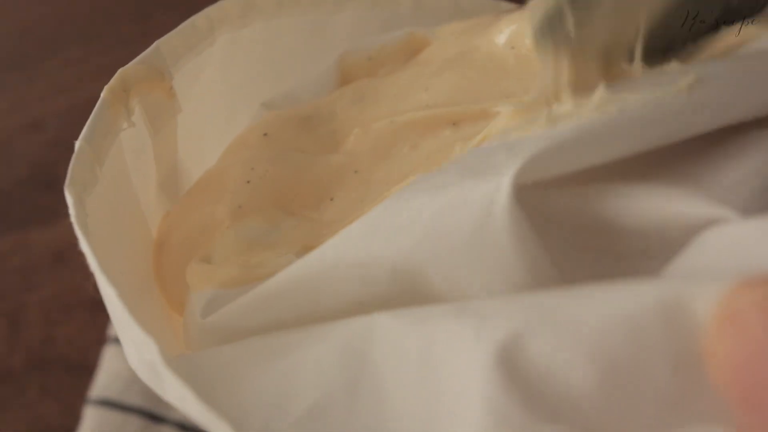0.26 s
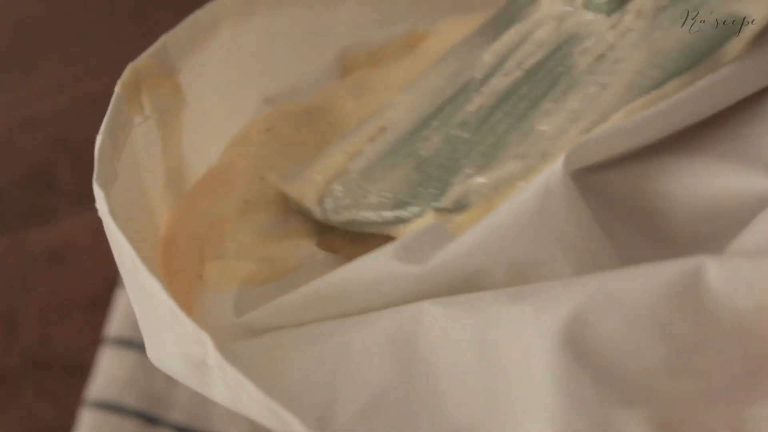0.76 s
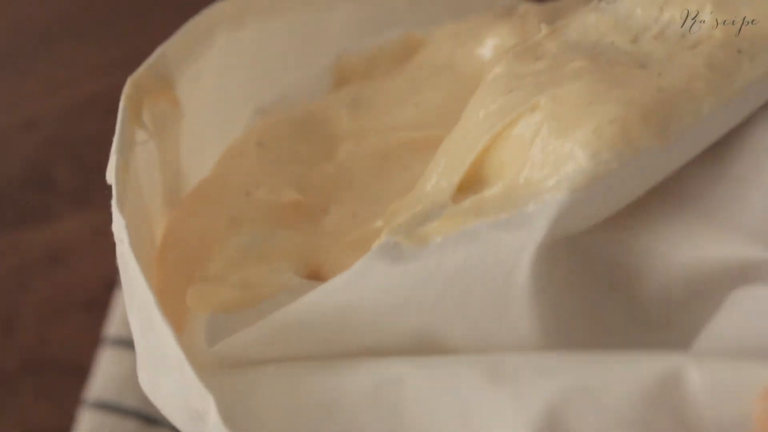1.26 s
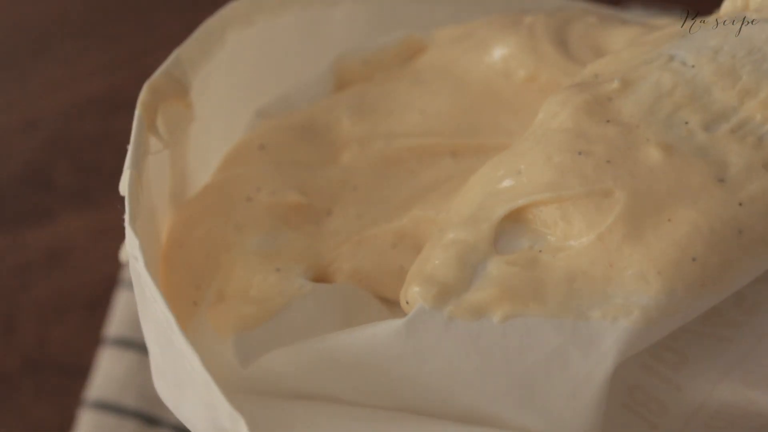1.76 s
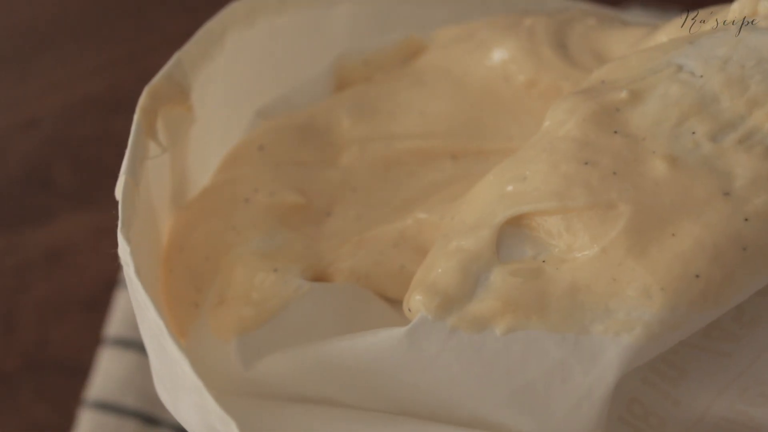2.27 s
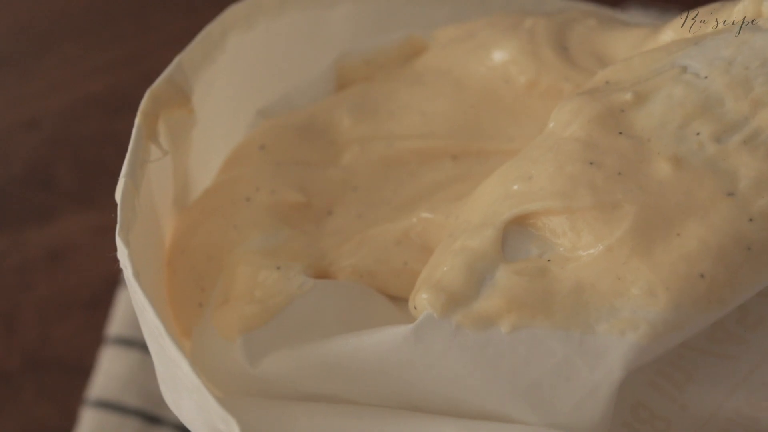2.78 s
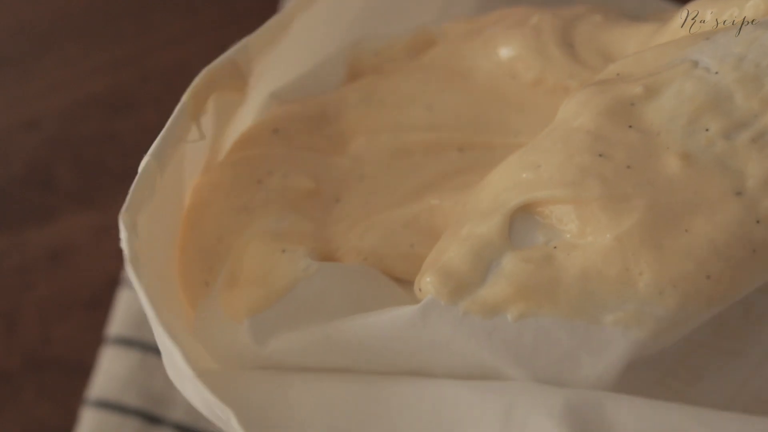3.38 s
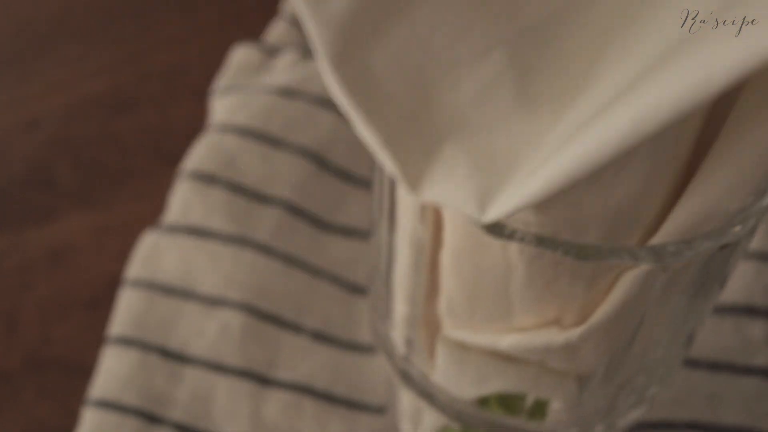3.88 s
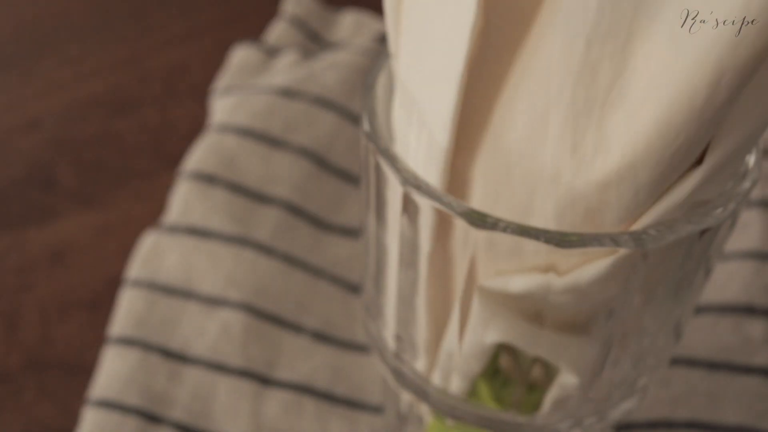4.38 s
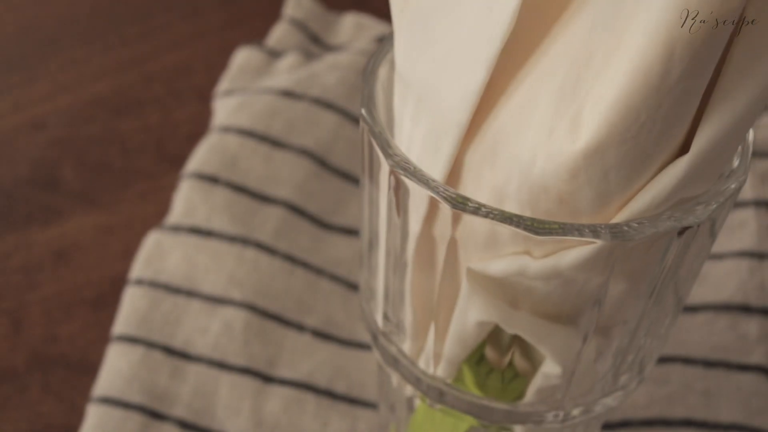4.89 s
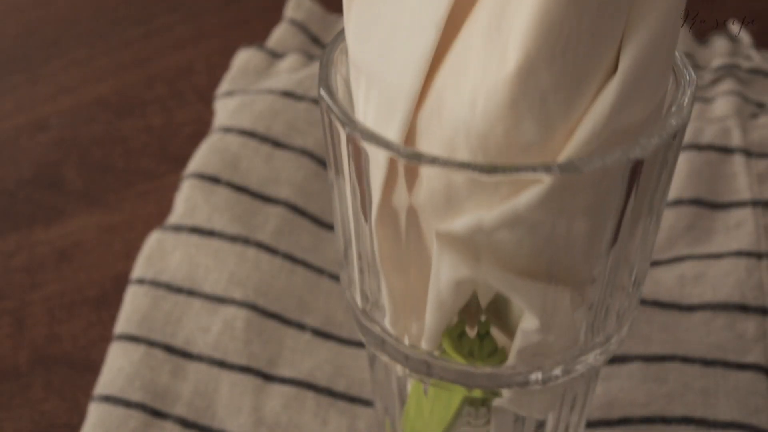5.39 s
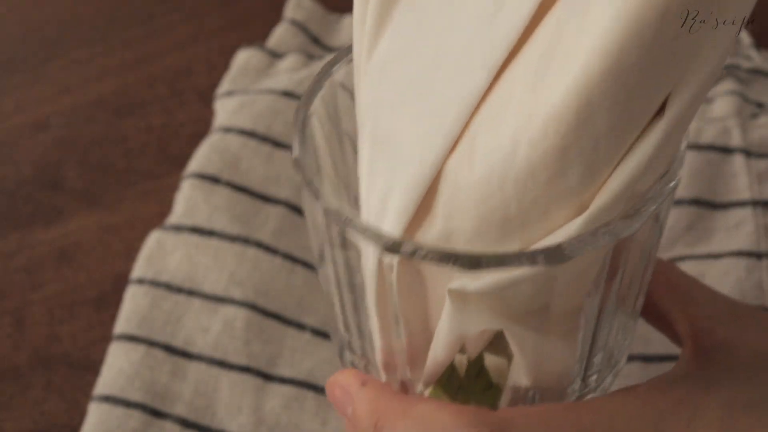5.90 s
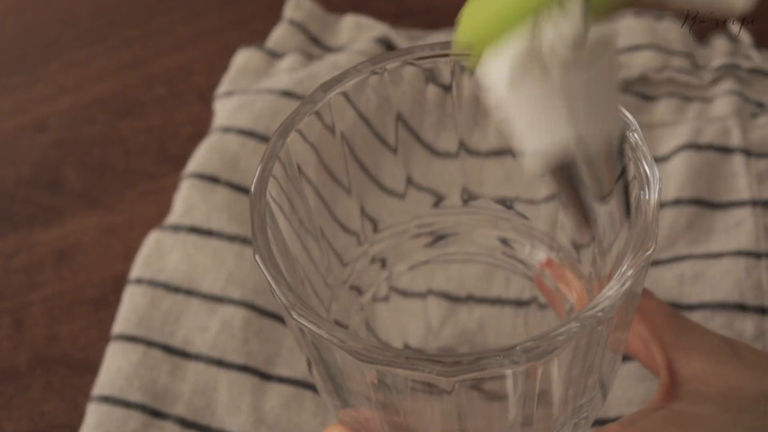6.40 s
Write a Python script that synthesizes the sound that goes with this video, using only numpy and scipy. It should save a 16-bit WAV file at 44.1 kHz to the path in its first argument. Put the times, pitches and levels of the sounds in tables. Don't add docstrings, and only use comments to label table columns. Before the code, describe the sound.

Soft film rustling and one bowl knock lead to sharp, loud crackling of a heavy batter bag, then a tiny squeak and faint glass ring.

```python
import sys
import numpy as np
from scipy import signal
from scipy.fft import rfft, irfft
from scipy.io import wavfile
from scipy.ndimage import uniform_filter1d

SR = 44100
rng = np.random.default_rng(int(sys.argv[2]) if len(sys.argv) > 2 else 0)


def transcribe(u):
    v = np.clip(np.atleast_2d(u).T, -1, 1)
    q = np.round(v * 32767).astype(np.int16)
    wavfile.write(sys.argv[1], SR, q)


def voltage_ratio(decibels):
    exponent = np.asarray(decibels, float) / 20
    return 10 ** exponent


N = 293265
LIFT_S, SCENE_CHANGE_S = 3.37, 1.028

BAND_HZ = (1350, 4200, 11000)
BAND_WIDTH_HZ = (1400, 4500, 7000)
# [f/Hz, level/dB]
FILM_COLOUR = [(450, -5.5), (700, -4.5), (1800, -8), (2600, -3), (3500, -1), (5000, -2), (7000, -2),
               (9000, -3), (12000, -13), (16000, -22)]
# [f/Hz, level/dB]
TAUT_COLOUR = [(1500, 7.5), (2100, 11), (3000, 6.5), (4200, 9.5), (6400, 14), (7100, 6.5), (14500, 13.5)]
# [f/Hz, level/dB]
SLACK_COLOUR = [(1000, 0.5), (1700, -1.5), (2200, 1), (3500, 0), (6500, 0.5), (9000, -1.5), (14000, 3)]
# [peak t/s, length/s, hiss
# level/dB, folds re hiss/dB, fizz re hiss/dB]
BRUSHES = [(.168, 0.18, -51.5, -27, -18), (.289, 0.14, -53, -8.5, -7), (.871, 0.14, -52, -33, -20.5),
           (.988, 0.043, -53, -25, -8), (1.08, 0.13, -52.5, -13, -1.5), (1.17, 0.066, -45.5, -3.5, -5.5),
           (1.24, 0.096, -43.5, -1.5, 1), (1.462, 0.28, -40.5, -6.5, -7.5), (2.886, 0.035, -46, 0, -26),
           (3.002, 0.1, -41.5, -0.5, 2), (3.154, 0.11, -63, -16, 6), (3.27, 0.13, -56, -2, -2),
           (3.517, 0.13, -39, 7, -4), (3.823, 0.028, -41, 11, -29), (3.98, 0.075, -37.5, 12, -10.5),
           (4.442, 0.069, -48.5, 18, 2), (4.472, 0.46, -44.5, 10, -23), (4.625, 0.098, -44, 1.5, -1),
           (4.745, 0.12, -43.5, 0.5, -9), (4.999, 0.024, -47, 5, -0.5), (5.192, 0.11, -34.5, 5.5, -26.5),
           (5.404, 0.14, -48.5, 10, -32), (5.8, 0.2, -73, 3, 6), (6.332, 0.16, -53.5, 2, -2),
           (6.492, 0.055, -52.5, -0.5, 4.5)]
# [full from t/s, length/s, hiss level/dB, folds re hiss/dB, fizz re hiss/dB]
DRAGS = [
    (.4, 0.28, -55.5, -13, -21),
    (.698, 0.11, -48.5, -14, -15.5),
    (2.946, 0.11, -45.5, -4, -33),
    (3.361, 0.16, -44, 2, 0),
    (3.569, 0.32, -33, 7, 0.5),
    (4.093, 0.44, -34.5, 9.5, -4.5),
    (5.172, 0.18, -40, -1, 7.5),
    (6.195, 0.12, -63.5, 8, 0.5),
]
# [peak t/s, length/s, hiss level/dB, folds re hiss/dB, fizz re hiss/dB]
FLICKS = [
    (1.722, 0.31, -47, -7, 4.5),
    (3.852, 0.19, -39, 9, -14),
    (4.862, 0.088, -50, 11.5, 7),
    (5.188, 0.063, -28, 10, -1),
    (5.968, 0.22, -62, 3, -19.5),
    (6.148, 0.071, -42, -20, 1.5),
    (6.164, 0.035, -56, 21.5, -10),
]
BRUSH_SHAPE = (0.56, 0, 0.51)
DRAG_SHAPE = (0.18, 0.48, 0.22)
FLICK_SHAPE = (0.12, 0, 0.71)
PUSH_SHAPE = (0.26, 0, 0.51)
# [folds/dB, hiss/dB, fizz/dB]
ENDS_DB = (-14.5, -16.5, -24.5)
# [folds/dB, hiss/dB, fizz/dB]
REST_DB = (-66, -79.5, -82)
# [t/s, level/dB, f/Hz]
TICKS = [(.2371, -30.5, 2500), (0.326, -38, 830), (0.6739, -30, 1570), (1.2491, -19.5, 1050),
         (1.2678, -29.5, 1080), (3.381, -28.5, 1060), (3.805, -19, 1660), (6.131, -29, 1940),
         (4.4732, -18.5, 1020), (4.514, -18.5, 1130), (4.754, -17, 2370), (4.8921, -18, 1690),
         (4.9929, -30, 905), (5.3215, -26.5, 1357), (6.559, -48, 4190)]
# [t/s, level/dB, f/Hz, bright edge/dB]
POPS_OUT = [
    (3.4959, -14, 1037, -22),
    (3.5048, -14, 1270, -15),
    (3.855, -2.5, 2760, -12),
    (3.931, -9, 1560, -17.5),
    (4.3774, -7.5, 2400, -28),
    (4.3811, -6, 790, -27),
    (4.6102, -12, 1290, -13),
    (5.358, -15, 1460, -14.5),
    (5.403, -3.5, 970, -22),
]
# [t/s, level/dB, f/Hz, bright edge/dB]
POPS_IN = [(3.4479, -5.5, 2170, -32), (3.562, -13, 800, -19), (3.7374, -5.5, 2380, -17.5),
           (3.847, -9.5, 890, -12.5), (3.877, -9.5, 1036, -25), (4.0888, -7, 1620, -11),
           (4.4764, 0.5, 886, -21.5), (4.563, -18, 790, -17.5), (4.8512, -7.5, 1454, -11),
           (5.461, -18, 1480, -45)]
# [t/s, level/dB, f/Hz]
NUDGES = [
    (0.2362, -28, 310),
    (0.3251, -22, 254),
    (0.6722, -18, 215),
    (1.2497, -16.5, 387),
    (5.0429, -23, 514),
    (5.5785, -9, 168),
    (5.809, -35.5, 152),
]
# [t/s, level/dB, f/Hz]
THUMPS = [(3.3821, -22.5, 200), (3.4475, -12, 400), (5.2148, -11, 232), (3.721, -15.5, 135),
          (3.738, -21.5, 220), (3.8538, -16, 222), (3.9323, -15.5, 154), (4.0895, -10, 186),
          (4.3776, -0.5, 396), (4.3807, -5, 149), (4.4771, -10, 194), (4.5649, -11, 140),
          (4.6101, -16, 165), (4.7557, -22, 251), (4.892, -10.5, 116), (4.9952, -19.5, 301),
          (5.138, -17, 190), (5.179, -11, 416), (5.1925, -16, 286), (5.322, -22.5, 233),
          (5.4032, -21.5, 355), (5.464, -26, 132)]
# [t/s, level/dB, f/Hz]
PINGS = [(3.5115, -22, 900), (3.5758, -19.5, 1310), (3.6682, -15.5, 1940), (3.6844, -18, 1630),
         (3.6935, -23, 4000), (3.7191, -21, 1340), (3.7978, -24.5, 1326), (3.8207, -24, 1270),
         (3.8938, -31.5, 1246), (3.9155, -33.5, 5000), (3.9819, -18.5, 2510), (3.9862, -21, 2516),
         (4.0258, -23, 2737), (4.0488, -22, 2590), (4.0636, -21, 2350), (4.085, -16.5, 2720),
         (4.1079, -25, 2494), (4.1211, -21, 2620), (4.1625, -18, 2510), (4.17, -18, 2360),
         (4.204, -24, 6560), (4.2107, -16.5, 1140), (4.2178, -24, 6060), (4.2712, -21.5, 5790),
         (4.2735, -19.5, 1102), (4.2868, -21.5, 5940), (4.3598, -22.5, 1150), (4.4259, -24.5, 1300),
         (4.7701, -32.5, 1850), (4.8598, -17.5, 6080), (5.0002, -38, 4290), (5.1218, -30.5, 5450),
         (5.1895, -17, 2490), (5.1939, -17, 1130), (5.3404, -37, 1220), (5.3757, -39, 1150),
         (0.0902, -38.5, 4360), (0.2169, -47, 4240), (0.6029, -52, 5560), (0.7093, -39, 3680),
               (1.7179, -31, 3800), (2.8239, -48.5, 2610), (2.99, -30, 2350), (3.0662, -39, 9400),
               (5.9683, -47, 3360), (6.0255, -51, 2920), (6.1001, -53, 4690), (6.2094, -34, 1650),
               (6.2334, -40, 1590), (6.2924, -39.5, 1710)]
# [t/s, level/dB, f/Hz]
LURCHES = [(3.3954, -32.5, 221), (3.5631, -24.5, 504), (3.6084, -25.5, 156), (3.6494, -17.5, 215),
           (3.6706, -23, 312), (3.691, -25, 160.5), (3.8058, -28.5, 339), (3.8209, -22.5, 500),
           (3.8473, -21, 295), (3.8932, -19.5, 155), (4.2014, -21.5, 548), (4.2756, -24, 199),
           (4.3, -21, 189.4), (4.525, -24, 210), (4.632, -27, 223), (4.6781, -21, 221), (4.707, -24, 210),
           (4.742, -23.5, 140.6), (4.863, -19.5, 155), (5.0064, -24.5, 182.4), (5.3585, -21.5, 520),
           (5.793, -42, 155), (5.8482, -45, 151), (5.9762, -44.5, 320), (6.027, -43, 199),
           (6.0674, -41.5, 264), (6.2017, -41, 178)]
# [t/s, level/dB, f/Hz, fall/turns]
SWAYS = [(3.726, -17, 140.4, .9), (3.878, -27, 297.4, 0.52), (4.411, -29, 200, 0.8),
         (4.542, -28, 169, 0.65), (4.591, -28, 169.8, 0.59), (4.8575, -15.5, 148, 1.2),
         (4.922, -24, 125, 1.1), (5.166, -21, 200, .6), (5.2005, -15, 251, 0.51), (5.231, -23.5, 178, 0.6),
         (5.5767, -18.5, 417, 0.64)]
# [t/s, length/s, level/dB, lowest f/Hz, highest f/Hz]
STROKES = [(0.246, 0.051, -50.5, 1750, 4060), (0.822, 0.086, -50.5, 690, 1400),
           (0.953, 0.079, -55.5, 1060, 1540), (1.362, 0.33, -51.5, 3160, 3850),
           (1.7, 0.021, -42, 1930, 5000), (4.677, .04, -37.5, 3600, 8600), (4.716, 0.045, -41, 3600, 9600),
           (4.737, 0.037, -39, 1440, 2280), (4.813, 0.035, -51.5, 7760, 10300),
           (5.8, 0.052, -64, 1601, 2430), (6.283, 0.108, -57, 512, 640), (6.418, .025, -56.5, 1520, 1850),
           (6.47, 0.14, -62, 1090, 2900)]
# [t/s, length/s, level/dB, lowest f/Hz, highest f/Hz]
RUBS = [(0.047, 0.14, -53.5, 3950, 6240), (0.335, 0.21, -57, 5200, 6240), (0.705, 0.067, -49, 1820, 2400),
        (1.721, 0.55, -56, 5200, 8000), (1.748, .3, -71, 2100, 4450), (2.802, 0.054, -63, 2000, 3600),
        (2.865, 0.048, -48, 1910, 3370), (2.937, 0.11, -46, 1910, 3400), (3.122, 0.12, -58.5, 5800, 7700),
        (3.221, 0.072, -43.5, 2930, 7600), (3.275, 0.12, -56, 3600, 7200),
        (3.305, 0.077, -49.5, 2030, 3200), (3.42, .03, -40, 1900, 3960), (4.45, 0.028, -44.5, 4000, 6430),
        (4.762, 0.017, -42, 1200, 5000), (5.33, 0.023, -52, 4540, 8500), (5.466, 0.049, -47.5, 900, 1730),
        (5.965, 0.061, -60.5, 1207, 9300), (6.04, 0.24, -58.5, 1000, 3100), (6.085, 0.072, -58, 2160, 5770),
        (6.191, 0.12, -52, 1400, 3100)]
# [t/s, f/Hz, level/dB, roughness/0-1]
SQUEAK = [
    (6.135, 791, -57, 0.14),
    (6.149, 878, -34, 0.02),
    (6.152, 922, -25.5, 0),
    (6.164, 919, -31, 0.02),
    (6.162, 926, -56, 0.3),
    (6.172, 974, -28.5, 0.05),
    (6.179, 960, -33.5, 0.05),
    (6.185, 1040, -65, 0.08),
]
# [multiple of f, level/dB]
SQUEAK_ORDERS = [(1, 2), (2, 7.5), (3, 10.5), (4, -4), (5, -3), (6, 2), (7, -8.5), (8, -13.5), (9, -12),
                 (10, -15), (11, -14)]
# [t/s, length/s, level/dB, tilt/dB per octave]
TOUCHES = [
    (6.175, .01, -50, -12),
    (6.303, 0.015, -42, 3),
    (6.333, 0.0136, -47, -9.5),
    (6.403, 0.024, -55, -14),
    (6.462, 0.05, -38.5, 8),
    (6.495, 0.0049, -40, -2.5),
]
# [level/dB, t60/s]
GLASS_HZ = (578, 1680, 2322, 5335, 5426, 5543, 5678, 9510, 10275, 10353, 13520, 14700)
GLASS_RING = [(-60, 0.08), (-11.5, 0.046), (-12, 0.4), (-14, 0.6), (-22, 0.19), (-0.5, 0.25), (-9, 0.086),
              (-28.5, 0.29), (-24.5, 0.18), (-29.5, 0.13), (-39.5, 0.14), (-37.5, 0.16)]
# [level/dB, t60/s]
BOWL_HZ = (95, 226, 339, 437, 470, 508, 615, 697, 1290, 1992, 3052, 4156, 4290, 5593)
BOWL_RING = [(-6.5, 0.14), (-25.5, 0.61), (-2, 0.088), (1, 0.11), (-15, 0.055), (-6, 0.13), (-21, 0.27),
             (-10, 0.063), (-8.5, 0.023), (-26, 0.24), (-43.5, 0.21), (-36, 0.09), (-45.5, 0.12),
             (-51.5, 0.08)]
# [f/Hz, level/dB per Hz]
HUM = [(35, -52), (60, -13), (113, -3.5), (211, 1.5), (327, -2), (368, 3.5), (624, -3.5), (736, -4),
       (1000, -32), (1300, -71), (2200, -120)]
# [f/Hz, level/dB per Hz]
BODY = [(35, -31), (60, -1), (87, 9.5), (145, 6), (460, -4.5), (511, -7.5), (1000, -27.5), (1300, -29.5),
        (2200, -120)]
# [t/s, level/dB]
BACKGROUND = [(0, -52.5), (.62, -58), (1.2, -52), (2.05, -55.5), (2.5, -59), (2.78, -49.5), (2.9, -68.5),
              (3.33, -62), (3.5, -37), (4.0, -37.5), (4.6, -29), (5.05, -50.5), (5.55, -67.5), (5.93, -57),
              (6.27, -48.5), (6.42, -93)]
# [peak t/s, length/s, level/dB]
PUSHES = [(0.306, 0.12, -48.5), (0.706, 0.056, -43.5), (1.181, 0.027, -47), (3.57, 0.099, -51),
          (3.715, 0.18, -35), (3.88, 0.26, -27), (4.1, 0.05, -26), (4.336, 0.32, -28.5),
          (4.542, 0.11, -21.5), (4.903, 0.17, -28.5), (5.048, 0.064, -37), (5.187, 0.24, -21.5),
          (5.384, 0.24, -37), (5.586, 0.045, -28), (5.793, 0.19, -47), (6.204, 0.081, -46)]


def evened(x):
    return x / np.sqrt(np.mean(x ** 2) + 1e-20)


def read(points, hz):
    f, value = np.transpose(points)
    return np.interp(np.log(hz + 1), np.log(f + 1), value)


def add(mix, s, sound):
    part = mix[round(s * SR):][:len(sound)]
    part += sound[:len(part)]


def band(x, lo_hz, hi_hz):
    sos = signal.butter(3, [lo_hz, min(hi_hz, 20000)], "band", fs=SR, output="sos")
    return signal.sosfilt(sos, x)


def ring(hz, t60, length):
    t = np.arange(round(length * SR)) / SR
    return voltage_ratio(-60 * t / t60) * np.sin(2 * np.pi * hz * t)


def unsteady(length, depth):
    drift = uniform_filter1d(rng.standard_normal(length), size=500)
    return 1 + depth * evened(uniform_filter1d(drift, size=500))


def swing(hz, rise, fall, length, lead=1):
    turns = np.arange(round(length * SR)) / SR * hz - lead
    bump = np.exp(-.5 * (turns / np.where(turns < 0, rise, fall)) ** 2)
    return np.cos(2 * np.pi * turns) * bump


def slips(per_s, spread_db, smooth):
    size = voltage_ratio(spread_db * np.minimum(rng.exponential(1, N), 4))
    size = size * (rng.random(N) < per_s / SR)
    return evened(evened(size * rng.standard_normal(N)) + smooth * rng.standard_normal(N))


def gesture(t, s, length, shares):
    rising, holding, falling = np.maximum(shares, [.02, 0, .02]) * max(length, .01)
    away = np.maximum((s - t) / rising, (t - s - holding) / falling)
    return np.maximum(away, 0) ** 1.26


def handling(t):
    power = voltage_ratio(np.array(REST_DB))[:, None] ** 2 + 0 * t
    for rows, shares in ((BRUSHES, BRUSH_SHAPE), (DRAGS, DRAG_SHAPE), (FLICKS, FLICK_SHAPE)):
        for s, length, db, folds_db, fizz_db in rows:
            full_db = db + np.c_[[folds_db, 0, fizz_db]]
            power = power + voltage_ratio(full_db + np.c_[list(ENDS_DB)] * gesture(t, s, length, shares)) ** 2
    return 10 * np.log10(power)


def rustle(patchy_db=2.3):
    grains = [slips(2500, 2.8, 1.1), slips(6000, 2.5, 1.5)]
    hz, t, (coarse, fine) = signal.stft(grains, SR, nperseg=256, noverlap=192)
    share = (1 / (1 + (hz / 5000) ** 2))[:, None]
    z = np.sqrt(share) * coarse + np.sqrt(1 - share) * fine

    per_hz_db = handling(t) - 10 * np.log10(np.array(BAND_WIDTH_HZ) / (SR / 2))[:, None]
    place = np.interp(np.log(hz + 1), np.log(BAND_HZ), np.arange(len(BAND_HZ)))
    weights = np.clip(1 - abs(place[:, None] - np.arange(len(BAND_HZ))), 0, 1)
    folds = uniform_filter1d(rng.standard_normal(z.shape[::-1]), size=24, axis=0)
    folds = evened(uniform_filter1d(folds, size=4, axis=1)).T
    flutter = evened(uniform_filter1d(rng.standard_normal(len(t)), size=10))

    colour_db = weights @ per_hz_db + read(FILM_COLOUR, hz)[:, None] + patchy_db * folds
    colour_db += read(TAUT_COLOUR, hz)[:, None] * (t < SCENE_CHANGE_S)
    colour_db += read(SLACK_COLOUR, hz)[:, None] * ((t > SCENE_CHANGE_S) & (t < LIFT_S))
    colour_db += 1.29 * place[:, None] * flutter
    return signal.istft(z * voltage_ratio(colour_db), SR, nperseg=256, noverlap=192)[1][:N]


def snaps(edge_t60=0.0051, crumbs_db=-16, crumbs_t60=0.019):
    rows = POPS_OUT + POPS_IN
    for s, db, hz in TICKS:
        rows = rows + [(s, db, hz, min(-13.5 + 5 * np.log2(hz / 1500), 23.5))]
    out, grit = np.zeros(N), rng.standard_normal((len(rows), 1323))
    t = np.arange(1323) / SR
    either_way = np.sign(grit[:len(TICKS), 0])
    ways = np.r_[np.ones(len(POPS_OUT)), -np.ones(len(POPS_IN)), either_way]
    for (s, db, hz, edge_db), noise, way in zip(rows, grit, ways):
        edge = band(noise * voltage_ratio(edge_db + 10 - 60 * t / edge_t60), 2700, 5810)
        crumbs = band(noise * voltage_ratio(crumbs_db - 60 * t / crumbs_t60), 0.2 * hz, 1.71 * hz)
        crumbs = crumbs * np.sqrt(SR / 2 / hz)
        add(out, s - 1 / hz, way * voltage_ratio(db) * swing(hz, .25, .4, .01))
        add(out, s - .0004, voltage_ratio(db) * (edge + crumbs))
    for s, db, hz in NUDGES:
        add(out, s - 1 / hz, voltage_ratio(db) * swing(hz, .145, .52, .05))
    for s, db, hz in THUMPS:
        add(out, s - 1 / hz, voltage_ratio(db) * swing(hz, .1, .55, .05))
    return out


def pings(ring_s=.0004, most_turns=2.5, lift_db=2.5, grit_db=-12):
    rows, out = PINGS, np.zeros(N)
    grit, t = rng.standard_normal((len(rows), 300)), np.arange(300) / SR
    for (s, db, hz), noise in zip(rows, grit):
        turns = np.clip(ring_s * hz, .4, most_turns)
        dust = voltage_ratio(db + lift_db + grit_db - 60 * t / 0.009) * noise
        add(out, s - 2 * turns / hz, voltage_ratio(db + lift_db) * swing(hz, .7 * turns, turns, .01, 2 * turns))
        add(out, s - .0005, band(dust, .5 * hz, 3.2 * hz))
    for s, db, hz in LURCHES:
        add(out, s - 1 / hz, voltage_ratio(db + 1.5) * swing(hz, 0.25, 0.602, .05))
    for s, db, hz, turns in SWAYS:
        add(out, s - 1 / hz, voltage_ratio(db) * swing(hz, 0.47, turns, .06))
    return out


def strokes(spacing_hz=1470, echo=.6):
    out, grit = np.zeros(N), rng.standard_normal((len(STROKES), 8000))
    feedback = np.r_[1, np.zeros(round(SR / spacing_hz) - 1), -echo]
    for (s, length, db, lo_hz, hi_hz), noise in zip(STROKES, grit):
        banded = signal.lfilter([1], feedback, noise)
        burst = band(band(banded, lo_hz, hi_hz), lo_hz, hi_hz)[:round(length * SR)]
        add(out, s, voltage_ratio(db) * evened(burst) * signal.windows.tukey(len(burst), .4))
    return out


def rubs(rise_s=0.0067, fade_db=-13.5):
    out, grit = np.zeros(N), rng.standard_normal((len(RUBS), SR))
    for (s, length, db, lo_hz, hi_hz), noise in zip(RUBS, grit):
        burst = band(band(noise, lo_hz, hi_hz), lo_hz, hi_hz)[:round(length * SR)]
        share = np.linspace(0, 1, len(burst))
        ends = np.clip(np.minimum(share * length / rise_s, 4 - 4 * share), 0, 1)
        add(out, s, voltage_ratio(db + fade_db * share) * evened(burst) * ends)
    return out


def squeak():
    s, *columns = np.transpose(SQUEAK)
    t = np.arange(s[0], s[-1], 1 / SR)
    hz, db, rough = (np.interp(t, s, c) for c in columns)
    waver = evened(uniform_filter1d(rng.standard_normal(4000), size=30))[:len(t)]
    turns = np.cumsum(hz * (1 + rough * waver)) / SR
    pulses = sum(voltage_ratio(d) * np.cos(2 * np.pi * k * turns) for k, d in SQUEAK_ORDERS)
    out = np.zeros(N)
    add(out, s[0], -voltage_ratio(db) * evened(pulses))
    return out


def glass():
    out, grit = np.zeros(N), rng.standard_normal((len(TOUCHES), 4000))
    for (s, length, db, tilt_db), noise in zip(TOUCHES, grit):
        scrape = noise[:round(length * SR)] * np.hanning(round(length * SR))
        modes = 0
        for hz, (mode_db, t60) in zip(GLASS_HZ, GLASS_RING):
            level = voltage_ratio(mode_db + tilt_db * np.log2(hz / 4000))
            modes = modes + level * ring(hz, t60, .5) * unsteady(SR // 2, .42)
        add(out, s, voltage_ratio(db + 7.5) * signal.oaconvolve(scrape / np.linalg.norm(scrape), modes))
    add(out, 6.162, voltage_ratio(-33) * ring(GLASS_HZ[3], .07, .2))
    return out


def knock(at_s=2.5455, ring_db=-2, crack_db=-8.5):
    out, t = np.zeros(N), np.arange(SR // 2) / SR
    modes = 0
    for hz, (db, t60) in zip(BOWL_HZ, BOWL_RING):
        build = (1 - np.exp(-t * hz)) ** 2
        modes = modes + voltage_ratio(db) * ring(hz, t60, .5) * unsteady(len(t), 0.27) * build
    rattle = band(rng.standard_normal(len(t)) * voltage_ratio(-8.5 - 60 * t / 0.1), 400, 1900)
    add(out, at_s, voltage_ratio(ring_db) * modes + voltage_ratio(crack_db) * rattle)
    add(out, at_s, voltage_ratio(crack_db) * swing(1500, .26, .7, .01))
    return out


def weight(t, push_ends_db=-18.5):
    power = voltage_ratio(np.interp(t, *np.transpose(BACKGROUND))) ** 2
    for s, length, db in PUSHES:
        power = power + voltage_ratio(db + push_ends_db * gesture(t, s, length, PUSH_SHAPE)) ** 2
    return 10 * np.log10(power)


def rumble():
    hz, t = np.fft.rfftfreq(N, 1 / SR), np.arange(N) / SR
    hum = evened(irfft(rfft(rng.standard_normal(N)) * voltage_ratio(read(HUM, hz)), N))
    body = evened(irfft(rfft(slips(400, 4, 0.8)) * voltage_ratio(read(BODY, hz)), N))
    lifted = np.clip((t - LIFT_S) / 0.025, 0, 1)
    level = voltage_ratio(np.interp(t, t[::64], weight(t[::64])))
    return level * (voltage_ratio(9.0) * (1 - lifted) * hum + voltage_ratio(-2.9) * lifted * body)


def kitchen(x, t60_low=0.58, t60_high=0.26):
    taps = np.zeros(SR // 2)
    at = np.arange(200, SR // 2 - 20, 20)
    taps[at + rng.integers(0, 20, len(at))] = rng.choice([-1., 1.], len(at))
    hz, t, z = signal.stft(taps, SR, nperseg=256)
    t60 = read([(300, t60_low), (6000, t60_high)], hz)[:, None]
    tail = signal.istft(z * voltage_ratio(-60 * t / t60), SR, nperseg=256)[1]
    return signal.oaconvolve(x, tail / np.linalg.norm(tail))[:N]


def hiss():
    noise = evened(band(rng.standard_normal(N), 2000, 16500))
    return voltage_ratio(-79.5) * noise * np.where(np.arange(N) < 5.9 * SR, 1, voltage_ratio(-14.5))


def scene():
    blow, creases, rim, slip = knock(), snaps() + pings(), glass(), squeak()
    mono = rumble() + rustle() + strokes() + rubs() + blow + creases + rim + slip + hiss()
    mono += kitchen(voltage_ratio(-13.0) * blow + voltage_ratio(-24.0) * creases + voltage_ratio(-13) * rim + voltage_ratio(-22) * slip)
    return np.array([mono, mono])


def roll_off(x):
    return signal.sosfilt(signal.butter(12, 16420, fs=SR, output="sos"), x)


def record(dry):
    since = np.arange(N) / SR - SCENE_CHANGE_S
    fade = np.where(since < 0, 1, np.clip(since / .09, .02, 1))
    low_cut = signal.lfilter(*signal.butter(2, 90, "high", fs=SR), dry * fade)
    return roll_off(np.clip(low_cut, -1, 1))


dry = scene()
out = record(dry)
transcribe(out)
```